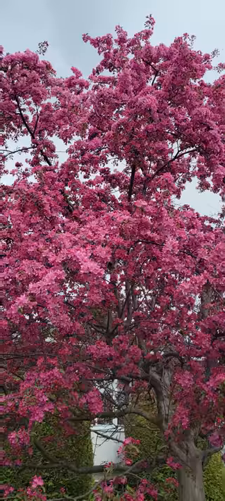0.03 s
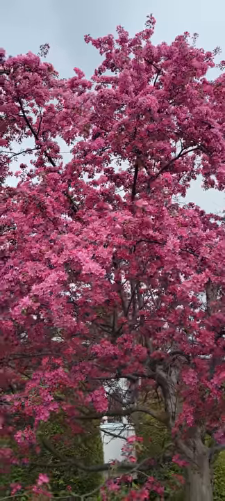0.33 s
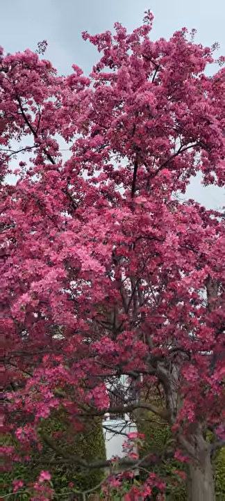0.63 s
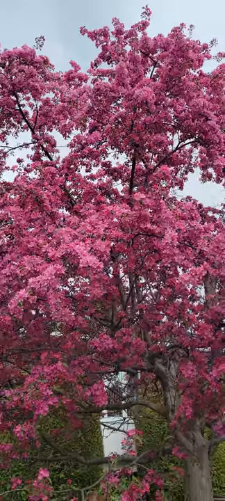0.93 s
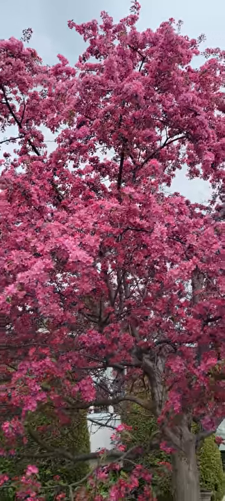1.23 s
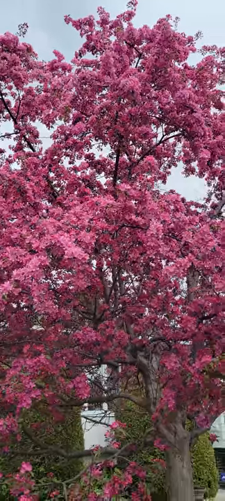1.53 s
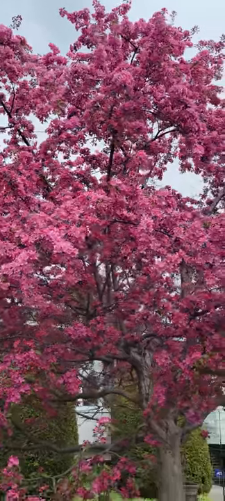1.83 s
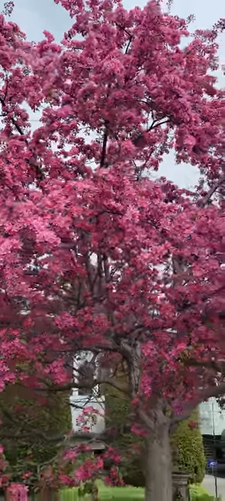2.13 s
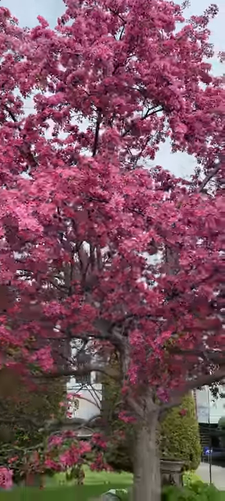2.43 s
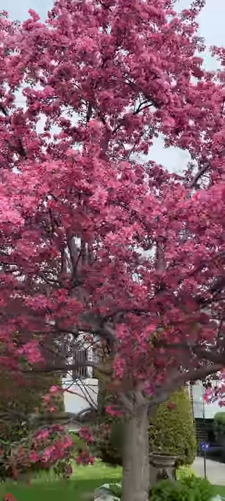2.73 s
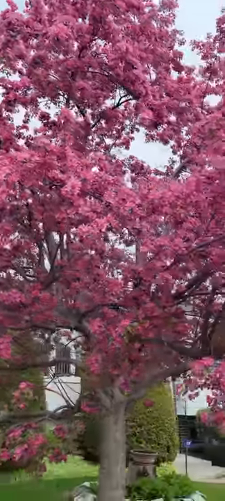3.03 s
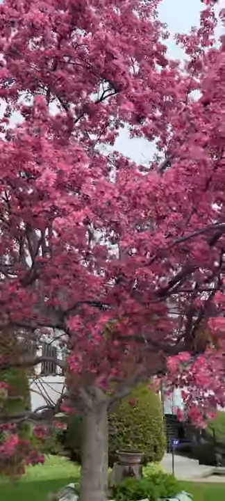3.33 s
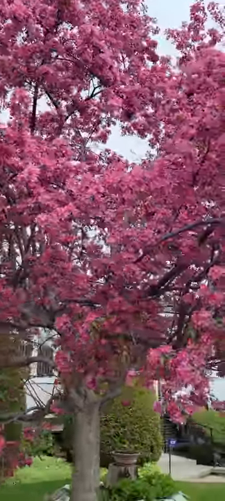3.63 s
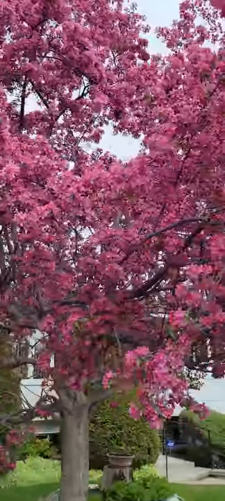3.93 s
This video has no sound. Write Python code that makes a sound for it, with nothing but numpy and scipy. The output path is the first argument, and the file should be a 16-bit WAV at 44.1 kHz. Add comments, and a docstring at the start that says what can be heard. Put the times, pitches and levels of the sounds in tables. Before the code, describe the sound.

Wind rumbles lightly on a hand-held microphone in a garden, over a steady wash of distant traffic and a faint hiss. At about 1.3 seconds there is one short handling click. From 2 seconds the wind buffets the left side, then hits the right harder with low thumps around 3 to 3.4 seconds. In the last second, fingers scuff softly on the device, briefly muffling the right side.

```python
"""A garden heard through a hand-held camera. From the start, distant tyres and engines merge into a steady
wash under a faint high hiss, and turbulent wind presses on the two microphone ports. At 1.3 s the grip
shifts and one sharp click rings the case. From 2 s the wind buffets the left port, then, harder, the
right. In the last second skin scuffs softly on the case, and between scuffs the right side is briefly
muffled."""
import sys
import numpy as np
from scipy import signal
from scipy.fft import rfft, irfft, next_fast_len
from scipy.io import wavfile
from scipy.ndimage import uniform_filter1d, map_coordinates

SR = 44100
rng = np.random.default_rng(int(sys.argv[2]) if len(sys.argv) > 2 else 0)


def inscribe(sig):
    """Save sig as 16-bit PCM at rate SR to the path in sys.argv[1].

    A 1-D sig is mono; a 2-D sig holds one channel per row.
    Samples are clipped to [-1, 1] before scaling.
    """
    pcm = np.round(np.clip(np.atleast_2d(sig).T, -1, 1) * 32767)
    wavfile.write(sys.argv[1], SR, pcm.astype(np.int16))


N = 176400


def amp(db):
    """Decibels as an amplitude ratio."""
    return 10 ** (np.asarray(db) / 20)


def unit(x):
    """Normalisation to rms 1."""
    return x / np.sqrt(np.mean(x ** 2) + 1e-20)


def along(points, hz):
    """Interpolation of (Hz, value) points on a logarithmic frequency axis."""
    f, v = np.transpose(points)
    return np.interp(np.log(hz + 1), np.log(f + 1), v)


def seconds():
    """The time of each sample."""
    return np.arange(N) / SR


def curve(rows):
    """Linear interpolation of (seconds, value) points."""
    return np.interp(seconds(), *np.transpose(rows))


def wobble(per_s):
    """Smooth random modulation: a spline through per_s random values a second."""
    return map_coordinates(rng.standard_normal(400), [seconds() * per_s], mode="mirror")


def filtered(x, response):
    """Linear filtering: the spectrum of x is multiplied by a frequency response."""
    size = next_fast_len(N + SR // 2)
    return irfft(rfft(x, size) * response(np.fft.rfftfreq(size, 1 / SR)), size)[..., :N]


def coloured(x, spectrum):
    """Spectral shaping by (Hz, relative dB) points, at rms 1."""
    return unit(filtered(x, lambda hz: amp(along(spectrum, hz))))


def evened(x, window_s):
    """Division by the running rms flattens the chance swells of a noise."""
    power = np.abs(uniform_filter1d(x * x, max(int(window_s * SR), 8)))
    return unit(x / np.sqrt(power + 0.065))


def traffic(patchy_db=1.0, drift_db=0.73):
    """Incoherent summation: far tyres and engines merge into a wash, partly coherent between the ports."""
    # Each row: frequency in Hz, relative spectral density in dB.
    left_spectrum = [(20, 4.5), (57, 18), (110, 10), (205, 2), (250, 1.5), (400, -3.5), (520, -2),
                     (640, -1.5), (850, -3), (980, -1.5), (1200, -4), (2100, -11.5), (2500, -9),
                     (3300, -16), (3700, -15.5), (4200, -21.5), (5100, -20.5), (6300, -27.5), (8000, -33.5),
                     (11400, -43), (13000, -38), (15500, -45)]
    right_spectrum = [(20, 8.5), (57, 17), (110, 11), (205, 3.5), (250, 2.5), (400, -2), (520, -2),
                      (640, -5), (810, 0.5), (980, -0.5), (1350, -2.5), (2100, -10), (2800, -12.5),
                      (3200, -21.5), (3700, -15.5), (4200, -25.5), (5400, -23.5), (6600, -38.5),
                      (7400, -32.5), (11400, -41.5), (12600, -36), (15500, -42.5)]
    # Each row: frequency in Hz, coherence of the two ports from 0 to 1.
    coherence = [(60, 0.77), (240, 1), (600, 0.55), (950, 0.59), (1600, 1), (2400, 0.91), (2900, 0.55),
                 (3100, .1), (3600, 0.7), (4300, 0.42), (5400, .55), (6300, 0.2), (7300, 0.39),
                 (9700, 0.41), (12000, .05)]
    # Each row: frequency in Hz, phase lead of the left port in radians.
    phase_lead = [(20, -0.05), (750, -0.5), (1500, 1.63), (2900, 1.48), (3300, -0.6), (4050, 1.67),
                  (4700, 0), (6200, -0.4), (6800, -0.9), (8000, -3), (10000, 0.7)]
    # The slow rise. Each row: time in seconds, level in dB.
    rise = [(0, -44.5), (1.5, -43.5), (2.8, -43), (4, -42.5)]
    # Gains in dB added to that level, left then right.
    port_db = [-2.5, -1.07]
    cells = signal.stft(rng.standard_normal((2, N)), nperseg=1024)[2]
    patches = uniform_filter1d(rng.standard_normal(cells.shape[1:]), size=5, axis=0)  # across frequency
    patches = unit(uniform_filter1d(patches, size=14, axis=1))  # across time
    pair = signal.istft(cells * amp(patchy_db * patches), nperseg=1024)[1][:, :N]
    angle = lambda hz: np.arccos(np.clip(along(coherence, hz), -1, 1)) / 2
    mid, side = filtered(pair, lambda hz: np.array([np.cos(angle(hz)), np.sin(angle(hz))]))
    left = filtered(mid + side, lambda hz: np.exp(1j * along(phase_lead, hz)))
    ports = np.array([coloured(left, left_spectrum), coloured(mid - side, right_spectrum)])
    return ports * amp(port_db)[:, None] * amp(curve(rise) + drift_db * wobble(per_s=4.29))


def drones():
    """Narrow-band noise has a vague pitch: the fuzzy tones of far engines and tyres, alike at both ports."""
    # Each row: centre in Hz, level at mid-scene in dB, bandwidth in Hz, swell in dB per second.
    bands = [(202.4, -62.5, 20, 2), (521.5, -65.5, 49, -0.9), (765, -67.5, 106, 0.9), (967, -66.5, 64, 3.5),
             (2540, -79.5, 11, 0.7)]
    from_middle = seconds() - N / SR / 2
    tones = np.zeros(N)
    for hz, db, width, swell in bands:
        band = filtered(rng.standard_normal(N), lambda f: np.exp(-2 * ((f - hz) / width) ** 2))
        tones += amp(db + swell * from_middle) * unit(band)
    return tones


def hiss():
    """Uncorrelated noise at the two ports makes a faint, diffuse high hiss that fades and returns."""
    # Each row: frequency in Hz, relative spectral density in dB.
    spectrum = [(2000, -31), (6000, -8), (7500, 2.5), (9000, -4), (11400, -12.5), (15500, -10)]
    # Each row: time in seconds, level in dB.
    levels = [(0, -78.5), (1.3, -77), (2, -90), (3, -90.5), (3.5, -80), (4, -78.5)]
    return np.array([coloured(rng.standard_normal(N), spectrum) for side in range(2)]) * amp(curve(levels))


def buffeting(port, spectrum, lump_db=1, lumps_per_s=35):
    """Turbulent pressure at one port: breeze and puffs add in power, and single eddies push and pull."""
    # Each row: time in seconds, left and right levels in dB.
    breeze = [(0, -54, -57), (1.1, -54, -60), (1.6, -57, -62), (2.1, -41, -51), (2.35, -43.5, -49),
              (2.9, -39.5, -39), (3.4, -42.5, -43.5), (4, -42, -47.5)]
    # Each row: centre in seconds, left and right levels in dB, half length in seconds.
    puffs = [(0.033, -42, -65, 0.035), (0.163, -33.5, -52, 0.0087), (0.222, -31, -40, 0.017),
             (0.269, -30, -35.5, 0.018), (0.356, -34.5, -40, 0.015), (0.423, -55, -41, 0.023),
             (0.503, -37, -48, 0.009), (0.87, -45, -42, 0.092), (1.67, -37.5, -32, 0.014),
             (1.791, -39.5, -33.5, 0.014), (1.866, -32.5, -55, 0.02), (2.09, -37, -48.5, 0.05),
             (2.467, -30, -35.5, 0.038), (2.595, -27.5, -32.5, 0.031), (2.663, -29.5, -27, 0.018),
             (2.784, -35, -23.5, 0.029), (2.97, -32, -27.5, 0.016), (3.02, -31, -23, 0.0094),
             (3.052, -34.5, -21.5, 0.0092), (3.115, -29, -21.5, 0.012), (3.237, -48, -28, 0.028),
             (3.291, -30.5, -32, 0.01), (3.348, -30.5, -19.5, 0.01), (3.403, -31.5, -20, 0.011),
             (3.471, -30, -29.5, 0.019), (3.602, -38, -24.5, 0.025), (3.666, -44, -33, 0.012),
             (3.837, -50, -32, 0.038), (3.944, -47, -33, 0.019), (4.0, -27, -35, 0.0055)]
    # Each row: centre in seconds, left and right envelope peaks in dB, frequency in Hz, width in seconds.
    eddies = [(0.703, -60, -28.5, 90, 0.0048), (1.254, -31, -60, 55.5, 0.009),
              (2.135, -21.5, -53, 80, 0.0034), (2.174, -22, -58, 77, 0.0034), (2.306, -20, -34, 82, 0.0065),
              (2.672, -24, -28, 80, 0.005), (2.768, -34, -22, 72, 0.0067), (3.062, -36, -18, 61.4, 0.0091),
              (3.355, -22.5, -10.5, 85.6, 0.0058), (3.993, -22.5, -34.5, 96, 0.0069)]
    t, thumps = seconds(), np.zeros(N)
    power = amp(curve([(s, db[port]) for s, *db in breeze])) ** 2
    for s, *db, half in puffs:
        power += (amp(db[port]) * np.exp(-((t - s) / half / 2) ** 2)) ** 2
    for s, *db, hz, width in eddies:
        envelope = amp(db[port]) * np.exp(-.5 * ((t - s) / width) ** 2)
        thumps -= envelope * np.sin(2 * np.pi * hz * (t - s))
    rumble = evened(coloured(rng.standard_normal(N), spectrum), window_s=0.04)
    lumpy_rumble = unit(rumble * amp(lump_db * wobble(lumps_per_s)))
    return lumpy_rumble * np.sqrt(power) + thumps


def wind():
    """Turbulence is local, so each port has its own independent rumble."""
    # Each row: frequency in Hz, relative spectral density in dB.
    left_spectrum = [(15, -30.5), (30, 2), (45, -2.5), (62, -0.5), (88, 4), (125, -13), (170, -15),
                     (280, -30.5), (500, -34.5), (1000, -66.5), (3000, -88)]
    right_spectrum = [(15, -28), (30, -8.5), (45, 0.5), (62, 6), (95, 0.5), (125, -8), (170, -16.5),
                      (280, -25), (450, -33.5), (700, -45), (1000, -67), (3000, -90.5)]
    return np.array([buffeting(0, left_spectrum), buffeting(1, right_spectrum)])


def ticks(events, spectrum, size=2048):
    """A minimum-phase pulse, its energy packed at the onset, for each (seconds, peak dB) event."""
    cepstrum = irfft(np.log(amp(along(spectrum, np.fft.rfftfreq(size, 1 / SR)))))
    tick = irfft(np.exp(rfft(2 * cepstrum[:size // 2], size) - cepstrum[0]))
    out = np.zeros(N)
    for s, db in events:
        out[round(s * SR):][:size] += amp(db) * tick / np.abs(tick).max()
    return out


def click():
    """Impulse excitation: a sharp tick sets the damped modes of the case ringing for a few cycles."""
    # Each row: start in seconds, peak of the tick in dB.
    impulses = [(1.2679, -27.5)]
    # Each row: frequency in Hz, relative level of the tick in dB.
    spectrum = [(100, -6), (400, 5), (800, 11.5), (1300, -5), (2200, -3), (3300, -4.5), (5000, -10),
                (7000, -22), (10000, -19), (12000, -32), (15000, -26)]
    # Each row: frequency in Hz, level relative to the tick in dB, time to decay by 60 dB in seconds.
    case_modes = [(480, -0.5, 0.0065), (1140, 4, 0.0025), (2600, -3.5, 0.0016)]
    out = ticks(impulses, spectrum)
    for s, db in impulses:
        age = np.maximum(seconds() - s, 0)
        for hz, ring_db, t60 in case_modes:
            out += amp(db + ring_db - 60 * age / t60) * np.sin(2 * np.pi * hz * age)
    return out


def scuffs():
    """Friction of skin on the case: each scuff is a burst of noise and one slip, both low-passed."""
    # Each row: centre in seconds, rubbing level in dB, length in seconds, cutoff in Hz, slip peak in dB.
    # Both levels apply ahead of the low-pass.
    contacts = [(3.017, -33, .005, 600, -35), (3.051, -30, 0.0056, 700, -39),
                (3.146, -41, 0.0048, 800, -18), (3.179, -36, 0.01, 520, -39.5),
                (3.223, -36, 0.022, 600, -46), (3.352, -29, .008, 397, -31),
                (3.384, -36.5, 0.0035, 550, -28), (3.402, -35.5, 0.0092, 520, -35),
                (3.487, -45.5, 0.014, 900, -47), (3.586, -33, .007, 1100, -28),
                (3.6155, -37, 0.0039, 2500, -21), (3.654, -39.5, 0.016, 650, -47),
                (3.668, -32, .007, 860, -29), (3.767, -39.5, .004, 1200, -22), (3.773, -39, .012, 900, -48),
                (3.819, -40.5, 0.02, 940, -32), (3.85, -44.5, 0.0034, 1090, -19.5),
                (3.925, -38, 0.005, 600, -36)]
    # Each row: frequency in Hz, relative spectral density in dB.
    spectrum = [(60, -9), (150, 12), (250, 3), (500, 8), (800, 7), (1100, -2), (1500, 1), (2100, -4),
                (3000, -19), (6000, -24), (15000, -39)]
    t, out = seconds(), np.zeros(N)
    friction = evened(coloured(rng.standard_normal(N), spectrum), window_s=0.0037)
    for s, db, length, cutoff_hz, slip_db in contacts:
        rub = amp(db) * np.exp(-2 * ((t - s) / length) ** 2) * friction
        slip = ticks([(s, slip_db)], spectrum)
        low_pass = signal.butter(2, cutoff_hz, fs=SR, output="sos")
        out += signal.sosfilt(low_pass, rub + slip + 1e-12)
    return out


def handling(left_db=-7.5, left_phase_rad=2.4):
    """Structure-borne sound: click and scuffs cross the case to the left port weaker and nearly inverted."""
    right = click() + scuffs()
    left = amp(left_db) * filtered(right, lambda hz: np.exp(1j * left_phase_rad))
    return np.array([left, right])


def muffled(pair, edge_s=0.0031):
    """Frequency-dependent attenuation: the right side dips briefly, most in the bass and midrange."""
    # Each row: start in seconds, end in seconds, gain of the affected part in dB.
    dips = [(3.432, 3.488, -5), (3.516, 3.569, -6), (3.696, 3.756, -3.5)]
    # Each row: frequency in Hz, share of the amplitude affected from 0 to 1.
    share = [(100, 0.85), (1800, 1), (3000, 0.12), (5000, 0.43)]
    t = seconds()
    left, right = pair
    dip_db = sum(db * np.clip(np.minimum(t - start, end - t) / edge_s + .5, 0, 1) for start, end, db in dips)
    affected = filtered(right, lambda hz: np.clip(along(share, hz), 0, 1))
    return np.array([left, right + (amp(dip_db) - 1) * affected])


def scene():
    """Superposition of traffic, wind, hiss and handling at the two ports."""
    return muffled(traffic() + drones() + wind()) + hiss() + handling()


def record(dry):
    """Band limiting: the camera keeps nothing above its cutoff."""
    cutoff_hz = 15700
    return filtered(dry, lambda hz: hz < cutoff_hz)


dry = scene()
out = record(dry)
inscribe(out)
```